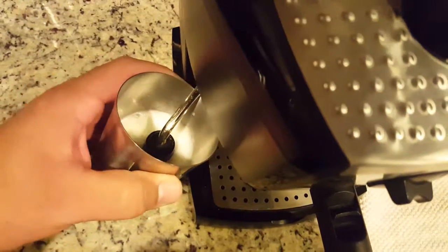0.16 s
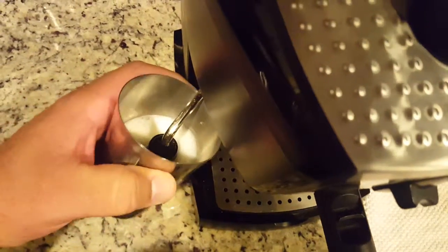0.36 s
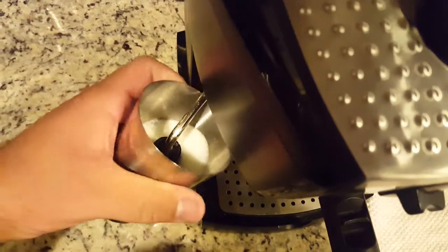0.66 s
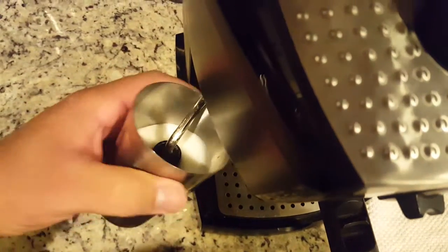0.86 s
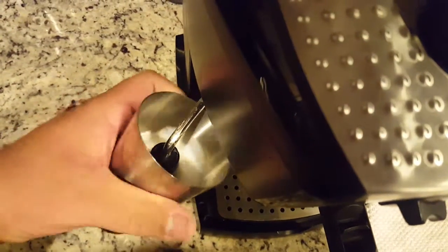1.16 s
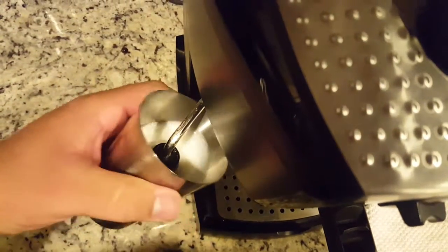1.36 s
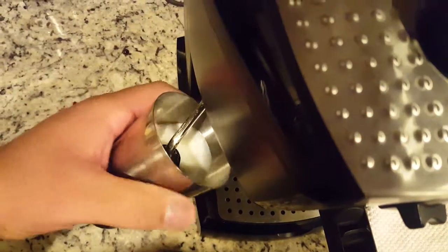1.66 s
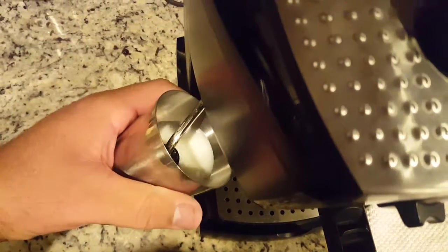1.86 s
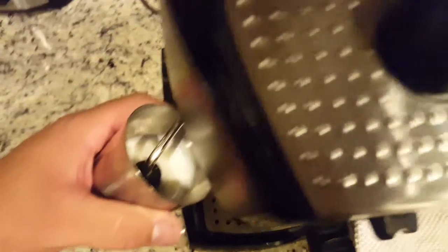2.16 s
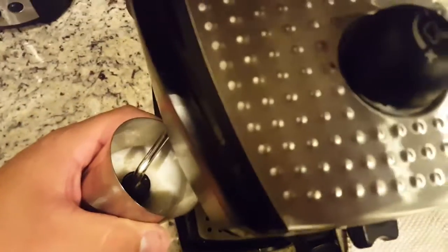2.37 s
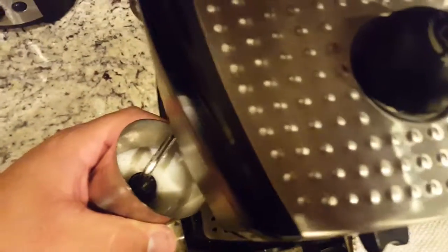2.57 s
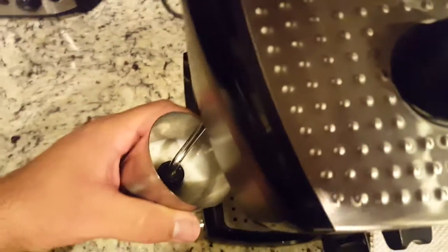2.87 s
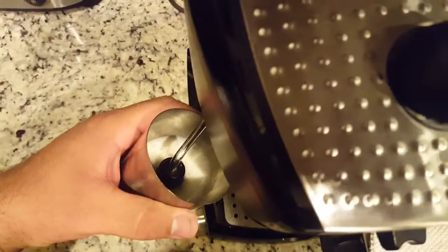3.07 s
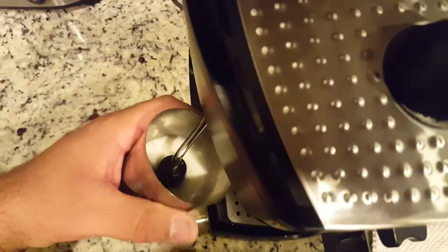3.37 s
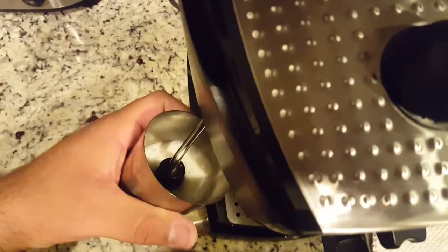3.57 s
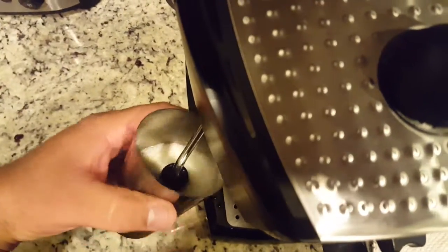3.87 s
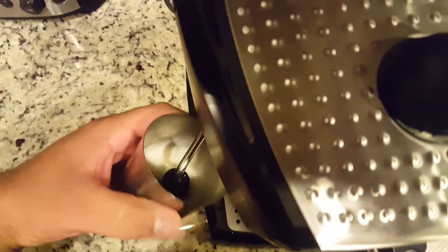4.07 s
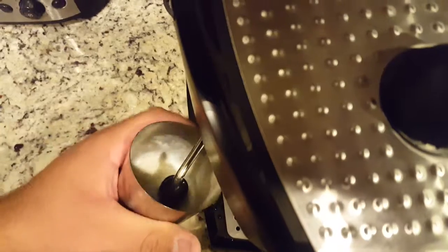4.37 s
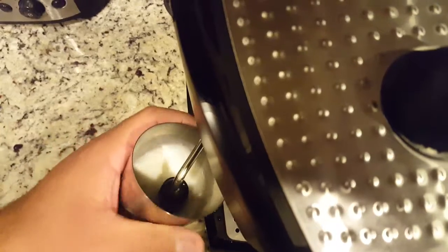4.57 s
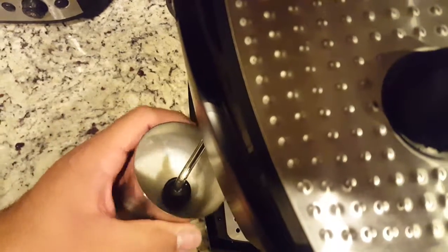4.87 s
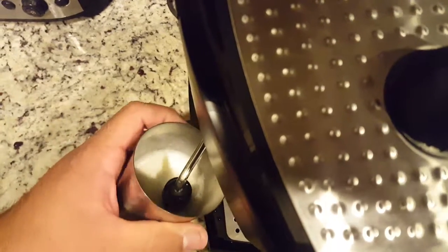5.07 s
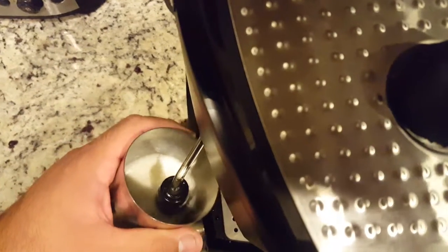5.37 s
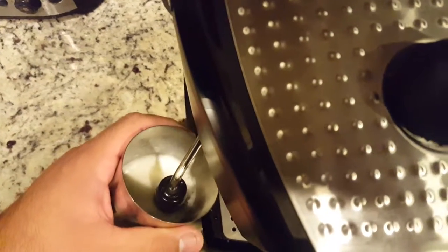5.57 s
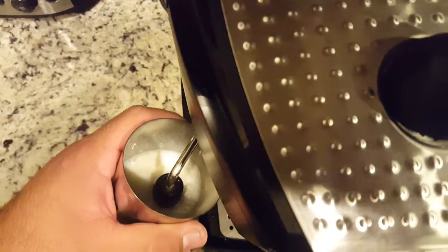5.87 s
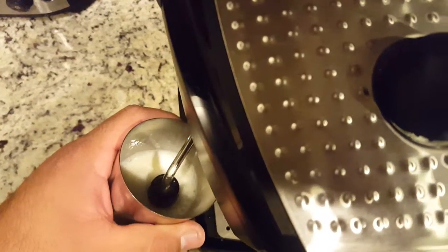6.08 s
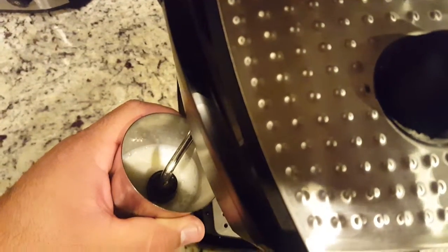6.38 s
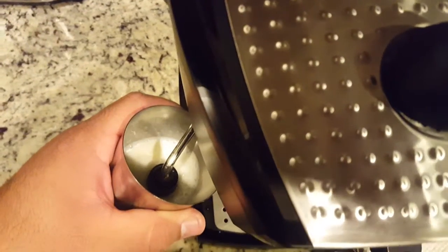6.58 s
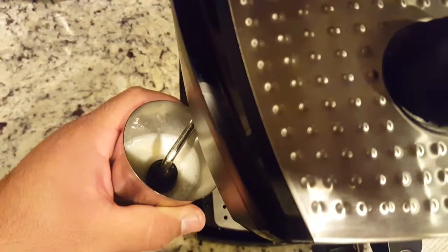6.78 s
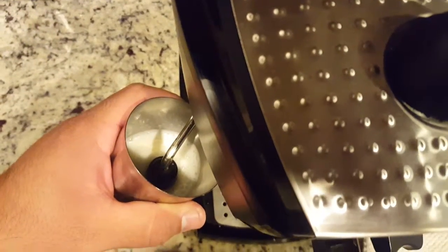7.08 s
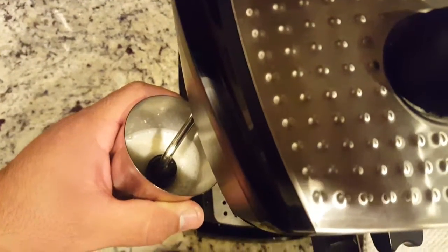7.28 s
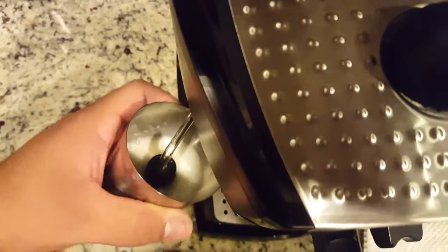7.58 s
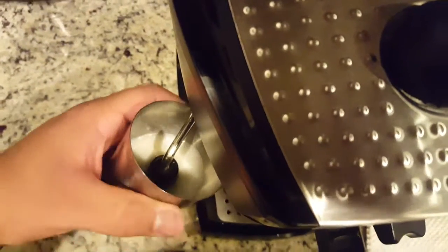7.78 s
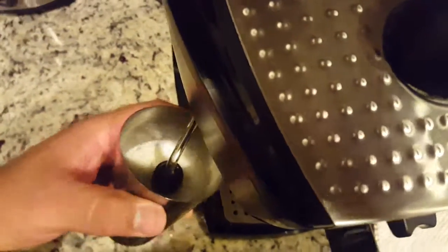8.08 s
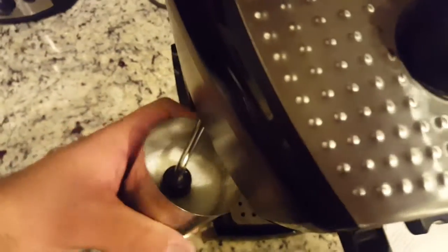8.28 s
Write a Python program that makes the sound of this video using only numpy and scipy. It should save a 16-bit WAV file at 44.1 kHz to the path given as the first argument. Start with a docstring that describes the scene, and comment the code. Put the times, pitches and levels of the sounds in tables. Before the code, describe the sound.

An espresso machine's steam wand rattles and hisses steadily in a small steel pitcher of milk, with wet gulps, thin whistles and occasional metallic bumps.

```python
"""A dense rattle of collapsing steam rings a small hand-held steel pitcher of milk, close to the microphone.
It comes from an espresso machine's steam wand: random clicks of noise feed the pitcher's resonances.
Big pockets gulp as short tones and choke the noise jet; the bubble cloud flares and the nozzle whistles.
Halfway through the pitcher is shifted: the ring breaks into froth and settles on other resonances.
Now and then the pitcher bumps the machine's ringing casing; the kitchen is low shaped noise behind it."""
import sys
import numpy as np
from scipy import signal
from scipy.fft import rfft, irfft, next_fast_len
from scipy.io import wavfile

SR = 44100
rng = np.random.default_rng(int(sys.argv[2]) if len(sys.argv) > 2 else 0)


def materialize(psi):
    """Save the field psi as 16-bit PCM at rate SR to the path in sys.argv[1].

    A 1-D psi becomes a single channel; in a 2-D psi each row is a channel.
    """
    bounded = np.clip(np.atleast_2d(psi).T, -1, 1)
    quanta = np.round(bounded * 32767).astype(np.int16)
    wavfile.write(sys.argv[1], SR, quanta)


N = 371763   # samples

# How far the tip sits in the milk. Each row: time in seconds, depth from 0 shallow to 1 deep.
TIP_DEPTH = [(0, .1), (1.5, 0), (4.28, .02), (4.4, .75), (4.8, 1), (5.2, .65), (5.6, 0.95), (8.43, .97)]
# Course of the pitcher's lowest resonances between big gulps; each user adds its own trim.
# Each row: time in seconds, level in dB.
GURGLE_LEVEL = [(0, -26), (0.9, -28.5), (1.4, -23), (2.2, -25.5), (3.8, -25.5), (4.45, -28), (4.95, -25.5),
                (5.5, -32), (6.6, -29), (7.9, -27), (8.43, -26)]
LEFT_LEAD_S = 0.0002   # direct sound reaches the left port this much earlier, unless told otherwise


def from_db(db):
    """Decibels to amplitude gain."""
    return np.exp(np.asarray(db) * (np.log(10) / 20))


def rms_one(x):
    """Scaled to an rms of 1."""
    return x / np.sqrt(np.mean(x ** 2) + 1e-20)


def in_time(rows):
    """Each column of a curve after the time column, sample by sample."""
    s, *columns = np.transpose(rows)
    return [np.interp(np.arange(N) / SR, s, c) for c in columns]


def by_depth(shallow, deep):
    """A value that follows the depth of the tip."""
    return shallow + (deep - shallow) * np.clip(in_time(TIP_DEPTH)[0], 0, 1)


def at_hz(points, hz):
    """A spectrum read on a log-frequency axis."""
    knots, values = np.transpose(points)
    return np.interp(np.log(hz + 1e-9), np.log(knots), values)


def panned(left_right_db):
    """Gains of the two channels for a left-right difference in dB."""
    return from_db(np.array([[.5], [-.5]]) * left_right_db)


def drift(rate_hz):
    """Noise smoothed by two equal poles at the given rate, with an rms of 1."""
    step = 40   # samples between values
    r = np.exp(-2 * np.pi * step * rate_hz / SR)
    white = rng.standard_normal(N // step + 2002)
    slow = signal.lfilter([1], [1, -2 * r, r * r], white)[2000:]   # the filter has settled by then
    return np.interp(np.arange(N) / step, np.arange(len(slow)), rms_one(slow))


def resonate(x, hz, width_hz):
    """A two-pole resonance applied twice, for steep skirts; gain about 1 on top."""
    r = np.exp(-np.pi * width_hz / SR)
    g = (1 - r * r) / 2
    section = [g, 0, -g, 1, -2 * r * np.cos(2 * np.pi * hz / SR), r * r]
    return signal.sosfilt([section] * 2, x)


def rattle(per_s, spread_db):
    """Bubbles collapse at random moments, a few much harder than the rest."""
    sizes = from_db(spread_db * np.minimum(rng.exponential(1, N), 5))
    return rms_one(sizes * (rng.random(N) < per_s / SR))


def swells(rows):
    """Bell-shaped swells summed in power, 3 dB under the peak at the ends of each length."""
    t = np.arange(0, N + 100, 100) / SR
    power = 0
    for s, length_s, db in rows:
        fall_db = 3 * np.minimum((2 * (t - s) / length_s) ** 2, 20)
        power = power + from_db(2 * (db - fall_db))
    return np.interp(np.arange(N) / SR, t, np.sqrt(power))


def at_ports(grain=1, spectrum=None, balance=None, lead_s=LEFT_LEAD_S):
    """Grainy noise at two microphone ports: a shared direct part with a left lead, an unrelated scattered part."""
    # Each row: frequency in Hz, share of the power common to both ports.
    likeness = [(60, 0.99), (250, 0.88), (600, 0.6), (1000, 0.9), (2000, 0.6), (3000, 0.15), (6000, 0.65),
                (9000, 0.35), (15000, 0.3)]
    size = next_fast_len(N)
    hz = np.arange(size // 2 + 1) * SR / size
    source = rfft(grain * rng.standard_normal((3, N)), size)
    alike = np.clip(at_hz(likeness, hz), 0, 1)
    direct = source[0] * np.exp(2j * np.pi * hz * lead_s * np.array([[.5], [-.5]]))
    both = np.sqrt(alike) * direct + np.sqrt(1 - alike) * source[1:]
    if spectrum is not None:
        both = both * from_db(at_hz(spectrum, hz))
    if balance is not None:
        both = both * panned(at_hz(balance, hz))
    return rms_one(irfft(both, size)[:, :N])


def wandering(hz, db, width_hz, waver, flutter_db, common=0.77, lead_s=LEFT_LEAD_S, steadiness=0):
    """A noise-fed resonance with a wavering pitch; steadiness evens out its strength towards a tone."""
    hz = hz * (1 + waver * drift(7))
    step = 10   # samples between values of the slow swing
    shape = (3, N // step + SR)
    white = rng.standard_normal(shape) + 1j * rng.standard_normal(shape)
    lowpass = signal.butter(2, width_hz / 2, fs=SR / step, output="sos")
    slow = signal.sosfilt(lowpass, white)[:, -(N // step + 2):]
    # part of the swing is common to both ports, the rest is each port's own
    direct = slow[0] * np.exp(2j * np.pi * hz.mean() * np.array([[lead_s], [0]]))
    swing = np.sqrt(common) * direct + np.sqrt(1 - common) * slow[1:]
    swing = swing / np.linalg.norm(swing, axis=0) ** steadiness
    swing = np.array([np.interp(np.arange(N) / step, np.arange(len(side)), side) for side in swing])
    carrier = np.exp(2j * np.pi * np.cumsum(hz) / SR)
    return from_db(db + flutter_db * drift(21)) * rms_one(np.real(swing * carrier))


def pockets(kicks):
    """Each pocket swells fast and dies away more slowly; a kick of 1 peaks at 1."""
    rise_s = 0.0063
    r = np.exp(-1 / (rise_s * SR))
    return signal.lfilter([0, np.e / (rise_s * SR)], [1, -2 * r, r * r], kicks + 1e-18)


def collapsing_steam(gulping):
    """Bubbles condense in uneven spurts and ring the pitcher in three groups of resonances."""
    # Resonances of the pitcher, low, middle and upper. Each row: frequency in Hz, width in Hz of one pass,
    # relative dB with the tip shallow, relative dB with it deep, left-right dB, left lead in radians.
    gurgle_modes = [(987.6, 49, -15, 7.5, .5, 1.2), (1073, 81, 11, -3, 3.5, 1.7),
                    (1156, 53, 8.5, -0.5, -4, 2.07)]
    howl_modes = [(1306, 50, 1.5, -50, 3, 2), (1383, 67, -6, -2, -9, 3), (1489.5, 71, 4.5, 4, -3.5, -2),
                  (1647, 89, 2, -12, 9, -2.5), (1689, 51, -12, 8.5, 5, 2.5), (1823, 25, -3.5, -6, 8, 0.1),
                  (1942, 74, 5.5, -4, -3, 1)]
    rasp_modes = [(2057, 148, -3.5, -1.5, -2.5, 1.8), (2217, 52, 4.5, 7, 2.5, 2.5),
                  (2363, 117, 6.5, 4.5, -4, 3), (2520, 100, -0.5, -6.5, -4, -1.27),
                  (2667, 96, -1, -6, 12, -2), (2822, 102, -6, -2.5, -2.5, -1),
                  (2920, 100, -12.5, -5.5, 5.5, 0.5), (3079, 95, -5, -13, 1.5, 0.9),
                  (3333, 200, -12.5, -15.5, 0.5, 1.65)]
    # Course of the middle and upper groups. Each row: time in seconds, level in dB before the trims below.
    howl_level = [(0, -36), (0.75, -40), (1.5, -32), (2.1, -42), (3.4, -37), (4.55, -34.5), (4.75, -27),
                  (5.05, -34), (5.85, -38.5), (6.3, -32.5), (6.9, -40), (7.55, -27.5), (8.43, -28)]
    rasp_level = [(0.0, -23.0), (0.35, -20), (1.6, -23.0), (1.8, -22), (2.9, -21.5), (3.9, -19.5),
                  (4.35, -23.5), (4.85, -24.5), (5.05, -25), (5.65, -25), (5.9, -23.0), (7.55, -24),
                  (7.8, -23), (8.42, -24.5)]
    (depth,), (gurgle_db,) = in_time(TIP_DEPTH), in_time(GURGLE_LEVEL)
    (howl_db,), (rasp_db,) = in_time(howl_level), in_time(rasp_level)
    spurts = drift(31)
    throb_db = 2.16 * drift(13.5)   # the milk heaves, and the low resonances throb most with it
    gulp_lift_db = 10 * gulping     # the strongest gulp lifts the middle group by 10 dB
    clicks = rattle(9000, 2.22) * rng.standard_normal((3, N))
    drive = signal.hilbert(clicks, next_fast_len(N))[:, :N]
    gurgle_gain = from_db(gurgle_db - 3.5 + throb_db + 1.0 * spurts)
    gurgle = gurgle_gain * pitcher(gurgle_modes, drive, depth, shifting_db=.5)
    howl_gain = from_db(howl_db + 5.5 + 0.65 * throb_db + gulp_lift_db + 2.3 * spurts)
    howl = howl_gain * pitcher(howl_modes, drive, depth, shifting_db=1.1)
    rasp_gain = from_db(rasp_db + 3.5 + 0.18 * throb_db + 0.45 * spurts)
    rasp = rasp_gain * pitcher(rasp_modes, drive, depth, shifting_db=2.0)
    return gurgle + howl + rasp + singing(throb_db) + cloud()


def pitcher(modes, drive, depth, shifting_db, shift_rate_hz=6):
    """The rattle rings the resonances; tip depth and sloshing milk decide which ones it feeds."""
    scattered = 0.28   # share of the ringing's power that reaches each port by its own way
    shallow, deep = 0, 0
    for hz, width_hz, shallow_db, deep_db, side_db, lead in modes:
        direct = np.real(drive[0] * np.exp(1j * lead * np.array([[.5], [-.5]])))
        fed = np.sqrt(1 - scattered) * direct + np.sqrt(scattered) * drive[1:].real
        shifting = from_db(shifting_db * drift(shift_rate_hz))
        ringing = resonate(fed, hz, width_hz) * panned(side_db) * shifting
        shallow = shallow + from_db(shallow_db) * ringing
        deep = deep + from_db(deep_db) * ringing
        drive = np.roll(drive, SR // 3, axis=1)   # every resonance is fed by other bubbles
    # the two sets blend at constant power
    weight = np.clip(depth, 0, 1)
    a, b = rms_one(shallow), rms_one(deep)
    overlap = np.mean(a * b)
    blend = np.sqrt(1 - weight) * a + np.sqrt(weight) * b
    return blend / np.sqrt(1 + 2 * overlap * np.sqrt(weight * (1 - weight)))


def singing(throb_db):
    """Two resonances of the pitcher stand out as narrow voices; the lower sinks with depth and swells."""
    # Each row: middle in seconds, length in seconds, peak in dB before the voice's own level.
    ring_swells = [(.55, .1, -27), (1.16, 0.084, -24.5), (3.19, 0.19, -21.5), (3.7, 0.79, -30.5),
                   (4.16, 0.068, -24), (4.51, 0.07, -23.5), (4.78, 0.252, -22.5), (7.0, 1.19, -25.5),
                   (8.3, 0.25, -30)]
    # A high voice that takes over as the froth settles. Each row: time in seconds, level in dB before flutter.
    high_level = [(5.6, -52), (5.85, -26), (6.8, -33.5), (8.43, -34.5)]
    swell = swells(ring_swells)
    hz = by_depth(1814, 1780) + 23.87 * swell / swell.max()   # pitch rises with the swell
    strength = np.hypot(swell, from_db(by_depth(-30.5, -42.5)))   # the second is the floor between swells
    voice = wandering(hz, 2.7 + .5 * throb_db, width_hz=64, waver=0.00318, flutter_db=0.0,
                      common=0.66, lead_s=0.00015, steadiness=0.16)
    high_voice = wandering(3124, *in_time(high_level), width_hz=81, waver=0.002035, flutter_db=-4.0,
                           common=.35, lead_s=-0.000018, steadiness=0.23)
    return strength * voice * panned(4.6) + high_voice


def cloud():
    """The bubble cloud round the tip holds a wavering pitch through a flare and slides to the next."""
    # Each row: middle in seconds, length in seconds, pitch in Hz, peak in dB before the voice's own level.
    flare_rows = [(.05, .15, 2460, -24), (.37, .15, 2360, -23), (.64, .2, 2520, -26.5),
                  (1.08, 0.13, 2660, -28), (1.43, 0.078, 2640, -27), (1.85, .22, 2520, -21.5),
                  (2.17, 0.19, 2640, -23), (2.56, 0.25, 2630, -24.5), (3.69, .14, 2635, -27),
                  (4.335, .09, 2720, -19), (4.53, .1, 2397, -29), (4.99, 0.065, 2374, -23),
                  (5.13, .14, 2620, -25), (5.34, .18, 2490, -29), (7.82, .2, 2365, -24.5),
                  (8.38, .26, 2385, -22.5)]
    pitch_rows = [(s + edge * length_s, hz) for s, length_s, hz, db in flare_rows for edge in (-.5, .5)]
    hz, = in_time(pitch_rows)
    flares = swells([(s, length_s, db) for s, length_s, hz_held, db in flare_rows])
    strength = np.hypot(flares, from_db(by_depth(-33, -39)))   # the second is the floor between flares
    return strength * wandering(hz, db=1.4, width_hz=86, waver=0.00595, flutter_db=2.6,
                                common=0.085, steadiness=0.34)


def big_pockets():
    """Strength of the big steam pockets, each a kick that swells and dies away."""
    # Each row: start in seconds, peak of the single pocket in dB.
    gulp_rows = [(.063, -26.5), (0.17, -11), (.190, -12.5), (0.267, -18), (0.521, -11), (.630, -14),
                 (.97, -22), (1.121, -21), (1.271, -10.5), (1.40, -33), (1.482, -13.5), (3.276, -18),
                 (3.42, -22), (4.829, -17), (4.95, -15.5), (5.039, -16.5), (5.11, -19), (5.182, -19.5),
                 (7.15, -20), (7.532, -19.5), (7.83, -17.5), (7.925, -23), (8.38, -25)]
    s, db = np.transpose(gulp_rows)
    return pockets(np.bincount((s * SR).astype(int), from_db(db), N))


def gulps(big, waver):
    """A pocket sounds the lowest resonance almost as a pure tone; small ones come at random among the big."""
    starts = rng.random(N) < 22 / SR   # about 22 small gulps a second
    small = pockets(starts * from_db(in_time(GURGLE_LEVEL)[0] - 0.5))
    hz = by_depth(1070, 982) * (1 + waver * drift(24.7))
    cycles = np.cumsum(hz) / SR + hz * np.array([[LEFT_LEAD_S], [0]])
    return np.hypot(big, small) * np.sin(2 * np.pi * cycles) * panned(1.5)


def radiated(x):
    """The small pitcher radiates almost nothing under its lowest resonance."""
    return signal.sosfilt(signal.butter(10, 905, "high", fs=SR, output="sos"), x)


def jet(gulping):
    """The hiss and whistle of the nozzle, the fizz of fine foam and the tearing of drawn-in air."""
    # Each row: time in seconds, hiss in dB, foam fizz in dB, both before the trims below.
    jet_level = [(0.0, -38.5, -43.5), (0.55, -38.0, -44.0), (0.75, -32, -39.5), (0.9, -36.0, -42),
                 (1.3, -34.5, -41.0), (1.75, -34.5, -36), (2.3, -35, -40.5), (3.35, -38.5, -39.5),
                 (3.55, -35.5, -41.5), (4.35, -35.5, -39), (4.95, -36, -43.0), (5.3, -34, -37.5),
                 (5.75, -37.5, -42.0), (6.0, -35.5, -42.5), (6.4, -39, -43), (7.5, -35.5, -43.0),
                 (7.8, -33, -38.5), (8.42, -37, -40)]
    # Air drawn in at the surface. Each row: time in seconds, froth in dB before the jet's shaping.
    froth_level = [(0, -36), (2.2, -38), (3.7, -37), (3.83, -34), (4.0, -35.5), (4.6, -37.5), (4.95, -31.5),
                   (5.15, -30), (5.35, -26.5), (5.6, -27.5), (5.8, -35.5), (7.3, -33), (8.43, -33.5)]
    # Spectra of the three noises. Each row: frequency in Hz, relative level per Hz in dB.
    hiss_spectrum = [(1500, -39), (3000, -28), (3700, -8), (4400, 4), (5400, 2), (5900, 4), (6600, 0.5),
                     (7800, 0.5), (9100, -1), (9900, -12.5), (11500, -32)]
    fizz_spectrum = [(2500, -50), (6000, -23), (8000, -1.5), (9400, 1), (10300, 0), (11300, 4),
                     (12700, 6.5), (14200, 4.5), (15700, -2)]
    froth_spectrum = [(700, -65), (880, -17), (980, -4), (1350, 3), (2400, -10), (3200, 5), (3900, 7),
                      (5000, -4), (8000, -23), (15000, -38)]
    # Side of hiss and fizz. Each row: frequency in Hz, left-right dB.
    jet_side = [(3500, 0.5), (4700, 5.7), (5800, 0.5), (7000, 3.6), (9000, 8.6), (11000, 1), (13500, 2.5)]
    # The breathy whistle. Each row: time in seconds, pitch in Hz before waver, level in dB before flutter.
    whistle_path = [(0, 5300, -42.5), (.35, 5670, -35.5), (.7, 5290, -39), (1.2, 5580, -31),
                    (1.45, 5300, -38), (1.65, 5720, -31), (1.95, 5396, -46), (2.2, 5050, -32),
                    (3.2, 5350, -38), (3.55, 5140, -29.5), (3.72, 5710, -29.5), (3.85, 4970, -50),
                    (4.2, 5130, -37), (5.75, 5013, -43), (5.87, 5387, -33.5), (6.4, 5672, -36),
                    (8.15, 5686, -40), (8.38, 5720, -28)]
    # Higher overtones of the pitcher. Each row: frequency in Hz, width in Hz of one pass, added share in dB.
    overtone_rows = [(4680, 42, -16), (5270, 260, -7), (5690, 120, -7)]
    (hiss_db, fizz_db), (froth_db,) = in_time(jet_level), in_time(froth_level)
    hiss = from_db(hiss_db + 6.0) * at_ports(rattle(30000, 0.5), hiss_spectrum, jet_side)
    fizz = from_db(fizz_db + 5.5) * at_ports(rattle(26000, 1.3), fizz_spectrum, jet_side)
    froth = from_db(froth_db) * at_ports(rattle(9000, 1.5), froth_spectrum)
    whistle = wandering(*in_time(whistle_path), width_hz=610, waver=.02, flutter_db=-2.0) * panned(1.9)
    # the strongest gulp chokes the jet by 4 dB
    unsteady_db = 0.48 * drift(90) + 0.68 * drift(6) - 4 * gulping
    steam = (hiss + fizz + froth + whistle) * from_db(unsteady_db)
    # the pitcher's mouth swallows a band round 3720 Hz, less of it with the tip deep
    steam = steam - by_depth(0.42, .1) * resonate(steam, 3720, 420)
    steam = steam + sum(from_db(db) * resonate(steam, hz, width_hz) for hz, width_hz, db in overtone_rows)
    patchy = patchy_treble(steam, patchy_db=2.5, rate_hz=9.3)
    return 1.016 * np.std(steam) * steel_echoes(patchy, strength=0.67, sway_s=0.0001635)


def patchy_treble(x, patchy_db, rate_hz):
    """The treble is patchy: each band below 15 kHz drifts in level on its own."""
    out, rest = 0, x
    for edge_hz in np.geomspace(3500, 15000, 18):
        below = signal.sosfiltfilt(signal.butter(6, edge_hz, fs=SR, output="sos"), rest)
        out = out + below * from_db(patchy_db * drift(rate_hz))
        rest = rest - below
    return out + rest


def steel_echoes(x, strength, sway_s, count=4):
    """Short echoes off the pitcher and the machine's front, shifting as the hand sways."""
    n, out = np.arange(N), x.copy()
    for channel in range(2):
        for lag_s in rng.uniform(.001, .007, count):
            delay = (lag_s + sway_s * drift(0.856)) * SR
            out[channel] += strength * np.interp(n - delay, n, x[channel])
    return rms_one(out)


def bumps(shudder_s):
    """The pitcher's soft, scuffing contact, a decaying noise burst, sets the machine's casing ringing."""
    # Each row: start in seconds, peak in dB, brightest frequency in Hz.
    bump_rows = [(0.404, -36, 480), (.851, -22, 500), (.905, -34.5, 250), (3.796, -35, 332),
                 (4.470, -39, 372), (5.849, -32, 299), (5.913, -54, 270), (8.173, -31, 480),
                 (8.299, -41, 403)]
    # Resonances of the casing. Each row: frequency in Hz, relative dB, time to fall by 60 dB in seconds.
    casing_modes = [(130, -25, .15), (222, -2.5, 0.32), (270, 4, 0.08), (384, 3, 0.046), (454, -14, 0.13),
                    (568, 6.5, 0.05), (725, -3, 0.045)]
    out, t = np.zeros(N + SR), np.arange(SR // 3) / SR
    for s, db, bright_hz in bump_rows:
        contact = rng.standard_normal(len(t)) * np.exp(-t / shudder_s)
        casing = 0
        for hz, mode_db, t60 in casing_modes:
            tilt_db = -10 * abs(np.log2(hz / bright_hz))   # 10 dB per octave away from the brightest
            casing = casing + from_db(mode_db + tilt_db - 60 * t / t60) * np.cos(2 * np.pi * hz * t)
        thud = signal.fftconvolve(contact, casing)[:len(t)]
        start = int(s * SR)
        out[start:start + len(t)] += from_db(db) * thud / np.abs(thud).max()
    return out[:N]


def kitchen():
    """The low murmur of the room, steady shaped noise with no lead at either port."""
    # Each row: frequency in Hz, relative level per Hz in dB.
    room_spectrum = [(15, -24), (25, -4), (36, -12), (60, 1.5), (85, 9), (118, 2), (150, -9.5), (210, -4),
                     (275, 2), (370, -7), (480, -6), (580, -4), (700, -9.5), (850, -4.5), (1300, -58)]
    return from_db(-50.5) * at_ports(spectrum=room_spectrum, lead_s=0) * panned(0.91)


def scene():
    """Steam, gulps, jet and bumps over the murmur of the kitchen."""
    big = big_pockets()
    gulping = big / big.max()
    from_pitcher = radiated(collapsing_steam(gulping) + gulps(big, waver=0.01997))
    return from_pitcher + jet(gulping) + bumps(shudder_s=0.011) + kitchen()


def record(dry):
    """The top is cut steeply above 15750 Hz."""
    return signal.sosfilt(signal.ellip(12, .1, 90, 15750, fs=SR, output="sos"), dry)


dry = scene()
out = record(dry)
materialize(out)
```